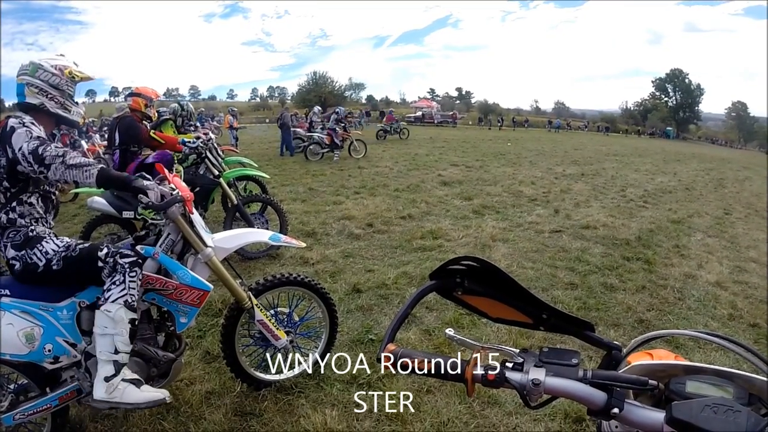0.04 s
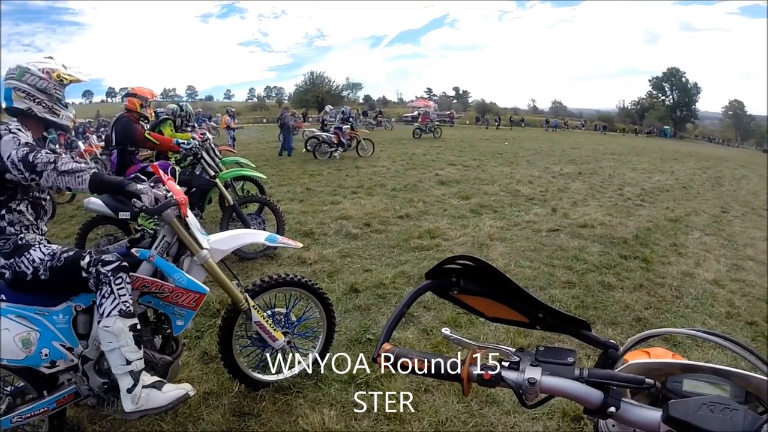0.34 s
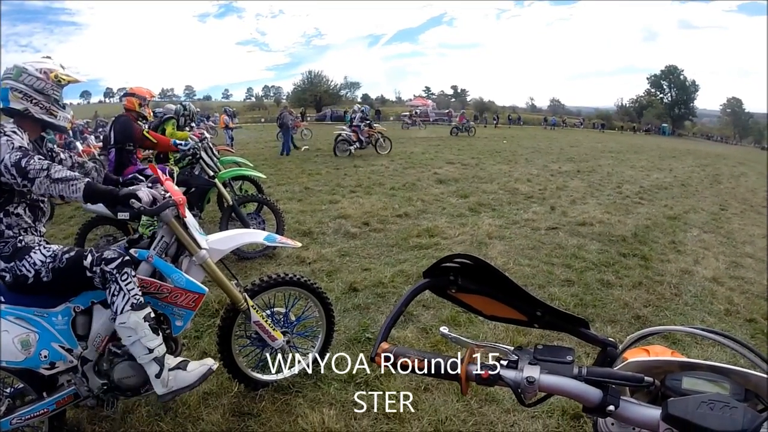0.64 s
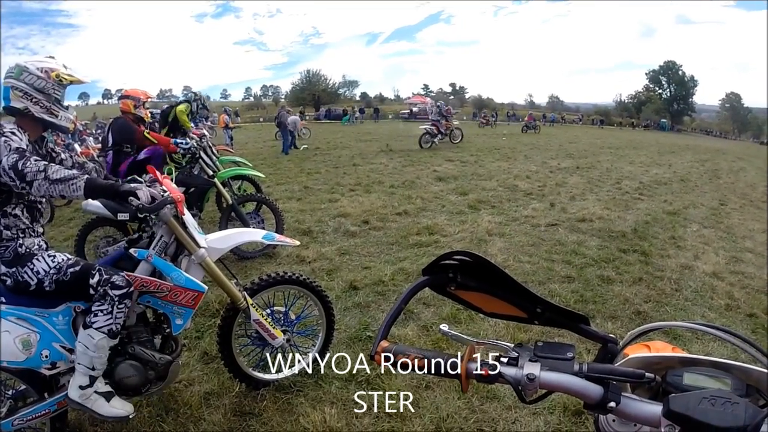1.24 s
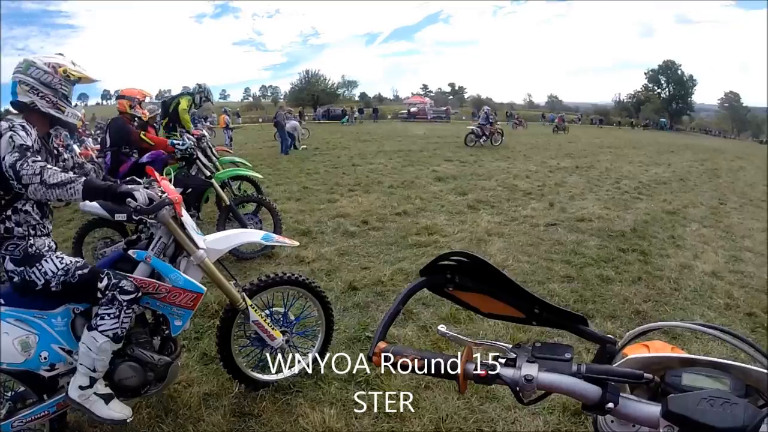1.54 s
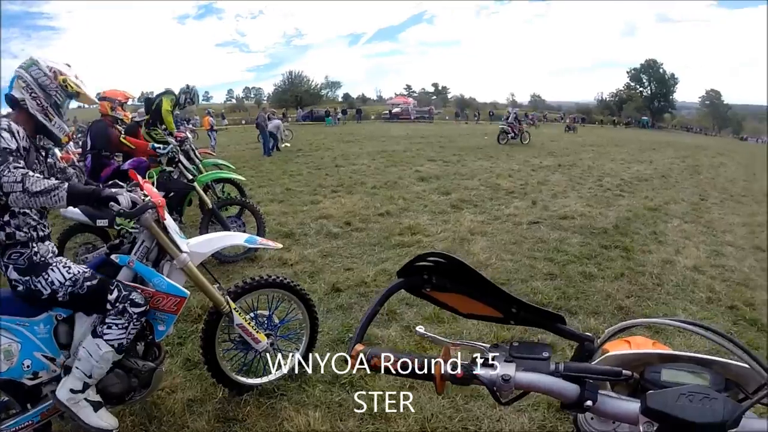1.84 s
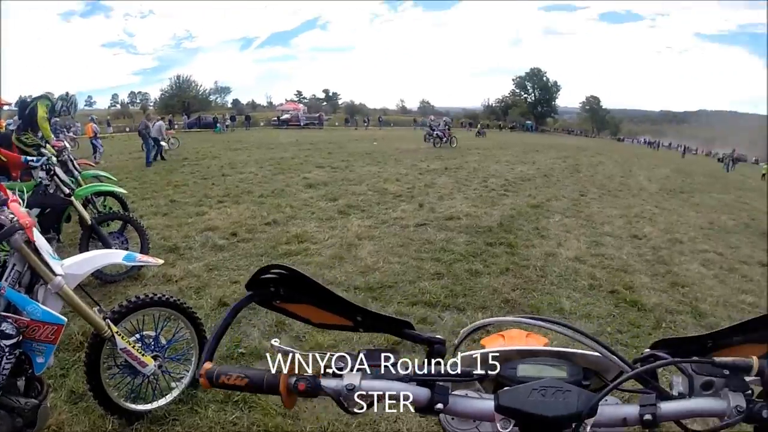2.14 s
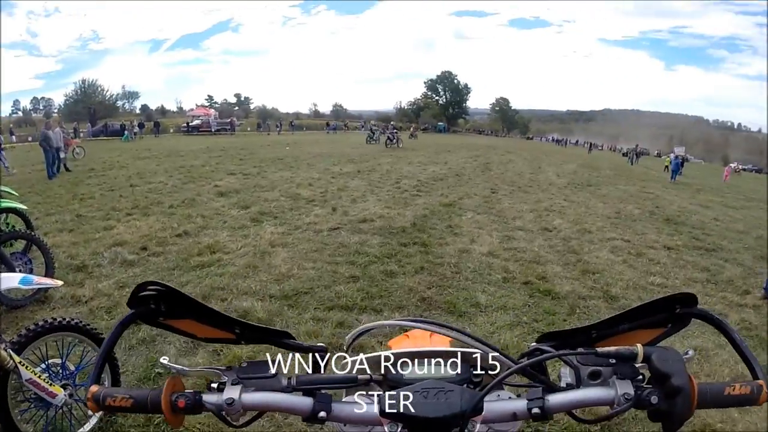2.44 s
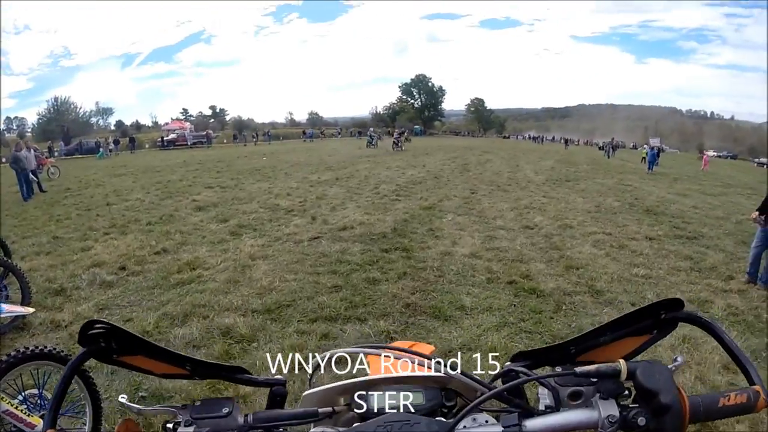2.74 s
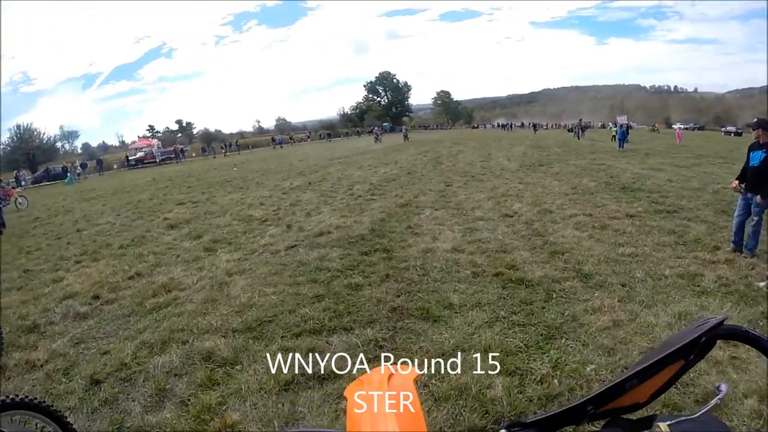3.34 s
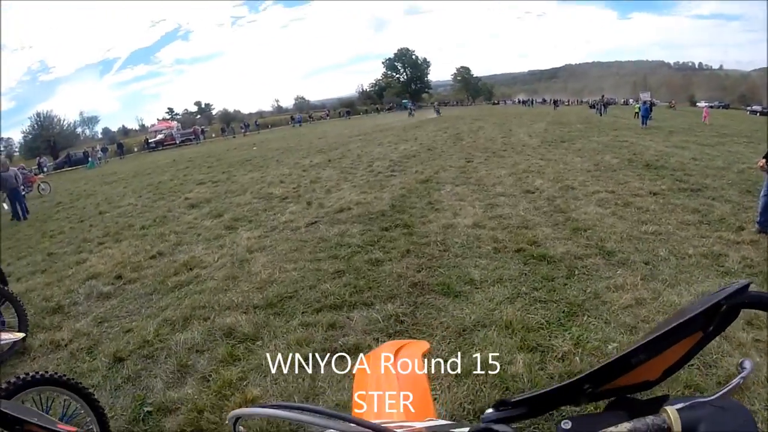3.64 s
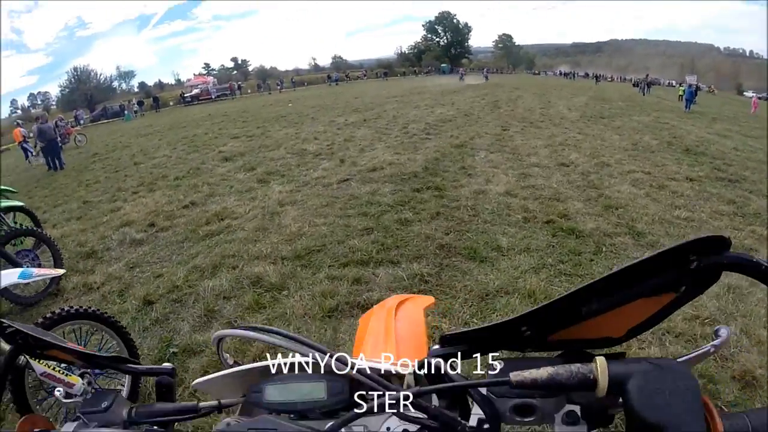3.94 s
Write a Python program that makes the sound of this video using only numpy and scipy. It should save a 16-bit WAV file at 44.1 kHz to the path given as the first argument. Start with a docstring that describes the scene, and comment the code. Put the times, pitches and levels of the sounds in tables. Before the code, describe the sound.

Dirt bikes rev close by with hard, ringing pops and a deeper thumping engine, climbing in pitch and staying high. Other bikes idle and roar farther off across an open field, heard from a rider's helmet.

```python
"""Dirt bikes at a start line.

Open grass field, heard from a rider's helmet. Each firing is a pulse and a puff of gas that ring
an exhaust. Two two-strokes rev with hard, ringing pops; a four-stroke idles, is blipped three
times, then held up. Behind them the rest of the row throbs and hisses."""
import sys
import numpy as np
from scipy import signal
from scipy.fft import rfft, irfft
from scipy.io import wavfile
from scipy.ndimage import uniform_filter1d, minimum_filter1d

SR = 44100
rng = np.random.default_rng(int(sys.argv[2]) if len(sys.argv) > 2 else 0)


def int16_out(signal):
    """Quantize to a 16-bit WAV file."""
    q = np.round(np.clip(np.atleast_2d(signal).T, -1, 1) * 32767)
    wavfile.write(sys.argv[1], SR, q.astype(np.int16))


N = 176400
TAPS = 8192
TIME_S = np.arange(N) / SR
BINS_HZ = np.fft.rfftfreq(TAPS, 1 / SR)

# Idling row, silencer booms: time_s, low_db, upper_db
ROW_LEVELS = [(0.0, -14.5, -32), (0.15, -47, -36), (0.42, -33, -34), (0.51, -40, -62), (0.68, -42, -30.5),
              (0.76, -33, -47), (1.47, -55, -33), (1.68, -41, -41), (1.86, -55, -27.5), (1.92, -45, -34.5),
              (2.57, -50, -35), (2.61, -24.5, -25), (2.66, -49, -56), (2.85, -40, -33), (3.98, -46, -54),
              (4.0, -41, -45)]
# Distant roar as other bikes open up: time_s, level_db
ROAR_LEVEL = [(0, -33.5), (.13, -33), (.2, -30.5), (.36, -27.5), (.52, -31), (.7, -26.5), (1.2, -26.5),
              (2.2, -27), (2.6, -30), (3.3, -28), (4, -29)]
# Distant engines and air: freq_hz, gain_db
ROAR_SPECTRUM = [(20, -5.5), (45, -7), (70, -1.5), (130, -1.5), (270, -3), (450, -13), (900, -15),
                 (1200, -6.5), (1500, -5), (1750, -10), (1900, -5.5), (2200, -6), (2540, 2), (2720, -2.5),
                 (2880, 1.5), (3200, -7.5), (3650, 0), (4150, -9), (4650, -2.5), (5400, -17.5), (6100, -14),
                 (7300, -23), (7900, -22.5), (10000, -31), (16000, -41)]

# Four-stroke speed: time_s, firing_hz
FOUR_STROKE_RATE = [(0.0, 10.37), (0.82, 11.16), (0.97, 37.35), (1.1, 32.01), (1.4, 31.33), (2.08, 30.32),
                    (2.2, 43.82), (2.4, 39.45), (2.58, 36.38), (2.66, 33.97), (2.79, 48.73), (2.98, 42.2),
                    (3.13, 38.67), (3.3, 39.91), (3.5, 45.81), (3.78, 48.32), (4.0, 45.24)]
# Four-stroke overall, and bark relative to thump: time_s, level_db
FOUR_STROKE_LEVEL = [(0, -44.5), (.8, -39), (.88, -36), (.96, -26), (1, -30.5), (1.05, -41.5), (1.4, -39),
                     (2.08, -38), (2.15, -29.5), (2.23, -31), (2.34, -44), (2.56, -38.5), (2.66, -44),
                     (2.74, -30), (2.81, -29), (2.87, -35.5), (3.1, -43.5), (3.38, -34), (3.8, -35),
                     (4, -34.5)]
BARK_LEVEL = [(0, -16), (.85, -3), (.95, 1.5), (1.05, -5), (2.2, -5), (2.8, -3), (3.3, -11), (4, -0.5)]
# Exhaust thump: freq_hz, gain_db
THUMP_SPECTRUM = [(30, -33), (80, -19.5), (150, 1), (250, 1), (340, 4), (400, -1.5), (480, -10.5),
                  (580, -6), (700, -13), (820, -9.5), (950, -16.5), (1250, -4), (2000, -24), (5000, -42),
                  (12000, -74)]
# Bark resonances: freq_hz, width_hz, gain_db
BARK_MODES = [(790, 120, -8), (1080, 160, -19), (1280, 160, -6.5), (2620, 1700, -11)]

# Near two-stroke speed: time_s, firing_hz
NEAR_RATE = [(0.0, 51.2), (0.15, 70.26), (0.25, 78.13), (0.37, 92.32), (0.55, 62.2), (0.7, 84.87),
             (0.83, 80.38), (0.94, 62.66), (1.1, 80.06), (1.28, 74.0), (1.38, 63.89), (1.6, 72.13),
             (1.69, 63.25), (1.82, 77.07), (2.0, 81.92), (2.13, 97.12), (2.58, 103.62), (2.72, 94.0),
             (2.86, 108.74), (2.98, 96.59), (3.3, 99.19), (3.42, 104.04), (4.0, 96.89)]
# Its main ring, low ring and intake: time_s, level_db
NEAR_MAIN_LEVEL = [(0.0, -43), (0.14, -44), (0.21, -34), (0.52, -42.5), (0.63, -28), (0.83, -31),
                   (0.86, -38), (0.98, -28), (1.27, -28), (1.38, -36.5), (1.66, -28.5), (1.78, -22.5),
                   (1.95, -29), (2.24, -27.5), (2.27, -32), (2.31, -25.5), (2.35, -31.5), (2.43, -28),
                   (2.75, -36.5), (2.83, -29), (3.12, -35.5), (3.2, -34), (3.23, -37), (4.0, -39.5)]
NEAR_LOW_LEVEL = [(0.0, -32.5), (0.13, -45), (0.17, -33), (0.38, -33), (0.52, -43.5), (0.66, -29),
                  (0.9, -35), (0.96, -27), (0.99, -29), (1.56, -40), (1.6, -54), (1.71, -33.5), (1.93, -40),
                  (2.21, -39.5), (2.67, -67), (2.75, -38), (2.82, -29), (2.85, -49), (3.98, -38),
                  (4.0, -42)]
INTAKE_LEVEL = [(0.0, -42.5), (0.27, -42), (0.54, -38), (0.71, -32), (0.88, -40.5), (0.99, -33),
                (1.26, -35), (1.36, -41), (1.48, -34.5), (1.59, -45), (1.7, -35.5), (1.74, -33),
                (1.84, -29), (1.96, -44), (2.0, -29), (2.6, -29), (2.62, -60), (2.67, -50), (2.84, -26),
                (3.03, -32.5), (3.72, -31), (4.0, -48)]
# Its exhaust resonances: freq_hz, width_hz, gain_db
NEAR_MAIN_MODES = [(1423, 78, -3.5), (1518, 96, -1), (1554, 32, -1), (2496, 75, -3), (2863, 96, -5),
                   (3590, 340, -8.5), (4770, 106, -13), (5570, 110, -15.5), (8000, 260, -28)]
NEAR_LOW_MODES = [(560, 24, -10), (800, 20, -10.5), (1034, 23, -5), (1198, 53, 0)]
# Intake tone: freq_hz, gain_db
INTAKE_SPECTRUM = [(60, 2), (105, -46.5), (155, -4.5), (212, 4), (255, 5.5), (305, -5), (400, -27.5),
                   (570, -13.5), (800, -32.5), (1000, -63)]
# Shelf on the upper intake harmonics: time_s, gain_db
INTAKE_SHELF = [(0, -3), (1.8, 3), (2.3, -0.5), (2.9, -1), (3.2, 2.5), (3.45, -10), (4, -14)]

# Sharp two-stroke speed: time_s, firing_hz
SHARP_RATE = [(0.0, 43.85), (0.8, 35.04), (1.2, 60.4), (1.35, 61.16), (1.65, 73.64), (2.0, 74.41),
              (2.25, 83.68), (2.5, 84.08), (2.72, 87.96), (2.85, 96.78), (2.95, 98.33), (3.05, 85.52),
              (3.2, 86.97), (3.45, 94.17), (3.7, 99.24), (4.0, 103.33)]
# Its band levels: time_s, low_db, mid_db, high_db, rasp_db, sizzle_db
SHARP_LEVELS = [(0.0, -62, -63, -73, -64, -64), (0.37, -52, -29, -31, -44, -45),
                (0.52, -58, -40, -35, -44, -52), (0.65, -47, -35, -30, -40, -47.5),
                (0.89, -41, -35, -34, -33, -48.5), (1.06, -31, -25, -36, -30.5, -45),
                (1.37, -38, -22.5, -25.5, -33, -48.5), (1.8, -33, -22, -31, -31.5, -46.5),
                (1.94, -45, -35, -53, -37, -46), (2.27, -26, -24, -26, -31.5, -43),
                (2.58, -23, -27.5, -24, -25, -41.5), (2.99, -25, -23.5, -28.5, -23.5, -38.5),
                (3.04, -24, -24.5, -34, -28, -52), (3.17, -24, -22.5, -29, -28, -39),
                (3.26, -25, -25.5, -29, -33.5, -45), (3.35, -23.5, -21.5, -23.5, -31.5, -36),
                (3.75, -26.5, -25, -21.5, -44, -44.5), (4.0, -36, -27.5, -31, -44, -47)]
# Its exhaust resonances: freq_hz, width_hz, gain_db
SHARP_LOW_MODES = [(1893, 47, 0.5), (2150, 90, -8)]
SHARP_MID_MODES = [(2561, 137, -0.64), (2884, 68, -0.36)]
SHARP_HIGH_MODES = [(3623, 560, 2.5), (3500, 69, -7)]
RASP_MODES = [(4636, 560, 1), (4640, 400, -0.5), (5390, 130, -8.5), (5940, 57, -10), (6550, 150, -45)]
# Its treble, and the dry crack leading each pop: freq_hz, gain_db
SIZZLE_SPECTRUM = [(4000, -62), (6300, 11), (6900, 1.5), (7350, -29), (7830, 7), (8350, -9.5), (8700, -7),
                   (9500, -14), (11500, -11), (13200, -22.5), (14200, -18), (16000, -58)]
CRACK_SPECTRUM = [(500, -33), (1100, -22), (1500, 1.5), (2200, -4), (3000, -5.5), (3700, 1), (4700, 4),
                  (5400, -7.5), (6500, -21), (9000, -19.5)]

# Echoes off the ground and neighbouring bikes: delay_s, gain_db
ECHOES = [(.0031, -23), (.0047, -14), (.0083, -17.5)]


def amp(db):
    """Decibels to gain."""
    return 10 ** (np.asarray(db) / 20)


def unit(x):
    """Scale to rms 1."""
    return x / np.sqrt(np.mean(x ** 2) + 1e-20)


def curve(table, column=1):
    """One column of a time table, per sample."""
    rows = np.array(table)
    return np.interp(TIME_S, rows[:, 0], rows[:, column])


def spectrum(table, at_hz=BINS_HZ):
    """Gain of a spectrum table, interpolated in log frequency."""
    freq_hz, gain_db = np.transpose(table)
    return amp(np.interp(np.log(at_hz + 1), np.log(freq_hz + 1), gain_db))


def pipe(modes, low_hz, high_hz):
    """Gain of resonances between two steep band edges."""
    power = sum(amp(db) ** 2 / (1 + (2 * (BINS_HZ - hz) / width_hz) ** 2) for hz, width_hz, db in modes)
    return np.sqrt(power / (1 + (low_hz / (BINS_HZ + 1)) ** 10) / (1 + (BINS_HZ / high_hz) ** 10))


def ring(x, gain):
    """Minimum-phase filter of the given shape; output rms 1."""
    log_gain = np.log(np.maximum(gain / gain.max(), 1e-5))
    mirrored = np.r_[log_gain, log_gain[-2:0:-1]]
    log_response = np.conj(signal.hilbert(mirrored))[:len(BINS_HZ)]
    impulse = irfft(np.exp(log_response))[:TAPS // 2]
    return unit(signal.oaconvolve(x, impulse)[:N])


def drift(hz):
    """Slow random wander, rms 1."""
    rolloff = np.exp(-(np.fft.rfftfreq(N, 1 / SR) / hz) ** 2)
    return unit(irfft(rfft(rng.standard_normal(N)) * rolloff, N))


def firings(rate_hz, uneven_db, jitter_s, start_cycles=0):
    """One click per cycle, uneven in strength and timing; equal power at any speed."""
    cycles = start_cycles + np.cumsum(rate_hz) / SR
    due = np.flatnonzero(np.diff(np.floor(cycles)) > 0)
    strength, lag = rng.standard_normal((len(due), 2)).T
    fired = np.clip(due + (lag * jitter_s * SR).astype(int), 0, N - 1)
    clicks = np.zeros(N)
    clicks[fired] = amp(uneven_db * np.minimum(strength, 1.3)) / np.sqrt(rate_hz[due])
    return clicks


def pops(clicks, gas_db, decay_s):
    """Per firing: a pressure pulse, then a dying puff of gas noise."""
    puff = signal.lfilter([1], [1, -np.exp(-1 / (decay_s * SR))], clicks + 1e-15)
    return unit(clicks) + amp(gas_db) * unit(puff * rng.standard_normal(N))


def idling_row():
    """Unevenly idling engines boom in their silencers."""
    clicks = firings(rate_hz=27.5 * amp(.4 * drift(hz=6)), uneven_db=1, jitter_s=.0007)
    low = ring(pops(clicks, gas_db=-6.5, decay_s=.016), pipe([(85.2, 10.4, 0)], low_hz=59.4, high_hz=115))
    clicks = firings(rate_hz=39 * amp(.3 * drift(hz=4.94)), uneven_db=2.5, jitter_s=.0004)
    upper = ring(pops(clicks, gas_db=-14, decay_s=.022), pipe([(153, 17, 0)], low_hz=119, high_hz=193))
    return amp(curve(ROW_LEVELS) - 1.5) * low + amp(curve(ROW_LEVELS, column=2) - 2.5) * upper


def distant_roar():
    """Many far engines merge into one ringing hiss."""
    hiss = ring(rng.standard_normal(N), spectrum(ROAR_SPECTRUM))
    return amp(curve(ROAR_LEVEL) + .81 * drift(hz=10)) * hiss


def four_stroke():
    """Slow, deep exhaust thumps swell and bark with each throttle blip."""
    clicks = firings(curve(FOUR_STROKE_RATE), uneven_db=.4, jitter_s=0, start_cycles=.27)
    thump = ring(pops(clicks, gas_db=-19, decay_s=.006), spectrum(THUMP_SPECTRUM))
    bark = ring(pops(clicks, gas_db=2.5, decay_s=.0038), pipe(BARK_MODES, low_hz=800, high_hz=4140))
    return amp(curve(FOUR_STROKE_LEVEL)) * (thump + amp(curve(BARK_LEVEL)) * bark)


def intake(rate_hz, shelf_hz=294):
    """Clean intake drone: eight harmonics of the firing rate."""
    cycles = np.cumsum(rate_hz) / SR
    shelf_db = curve(INTAKE_SHELF)
    drone = 0
    for k in range(1, 9):
        above_shelf = 1 / (1 + (shelf_hz / (k * rate_hz)) ** 20)
        gain = spectrum(INTAKE_SPECTRUM, k * rate_hz) * amp(shelf_db * above_shelf)
        drone += gain * np.cos(2 * np.pi * k * cycles)
    return amp(curve(INTAKE_LEVEL) + 1.55 * drift(hz=16) - 1) * unit(drone)


def near_two_stroke():
    """Revved in bursts: hollow exhaust pops over the intake drone."""
    rate_hz = curve(NEAR_RATE)
    clicks = firings(rate_hz, uneven_db=1.1, jitter_s=.00004)
    drive = pops(clicks, gas_db=-5, decay_s=.0076)
    main = ring(drive, pipe(NEAR_MAIN_MODES, low_hz=1280, high_hz=6500))
    low = ring(clicks, pipe(NEAR_LOW_MODES, low_hz=460, high_hz=1405))
    exhaust = amp(curve(NEAR_MAIN_LEVEL) + 3) * main + amp(curve(NEAR_LOW_LEVEL) - 3.5) * low
    return exhaust + intake(rate_hz)


def sharp_two_stroke(crack_cutoff_hz=10000):
    """Crisp pops ring the pipe and silencer as the speed climbs."""
    clicks = firings(curve(SHARP_RATE), uneven_db=.7, jitter_s=.00004)
    body = pops(clicks, gas_db=-2, decay_s=.003)
    snap = pops(clicks, gas_db=-2, decay_s=.001)
    gas = pops(clicks, gas_db=12, decay_s=.0022)
    bands = [amp(-5.5) * ring(body, pipe(SHARP_LOW_MODES, low_hz=1630, high_hz=2280)),
             amp(-3.5) * ring(body, pipe(SHARP_MID_MODES, low_hz=2260, high_hz=3440)),
             amp(-5.5) * ring(snap, pipe(SHARP_HIGH_MODES, low_hz=2740, high_hz=3980)),
             amp(-2) * ring(body, pipe(RASP_MODES, low_hz=3910, high_hz=6500)),
             amp(-.5) * ring(gas, spectrum(SIZZLE_SPECTRUM))]
    ringing = sum(band * amp(curve(SHARP_LEVELS, column)) for column, band in enumerate(bands, 1))
    lowpass = signal.butter(6, crack_cutoff_hz, fs=SR, output="sos")
    crack = signal.sosfilt(lowpass, ring(snap, spectrum(CRACK_SPECTRUM)))
    rasp_db = curve(SHARP_LEVELS, column=4)
    return ringing + amp(rasp_db - 5) * crack


def reflections(x, scatter_db=-13, t60_s=.14, cutoff_hz=900):
    """Direct sound plus close echoes and short scatter off the row; bass passes direct."""
    t = TIME_S[:TAPS]
    tail = unit(rng.standard_normal(TAPS) * amp(-60 * t / t60_s))
    impulse = amp(scatter_db) * tail / np.sqrt(TAPS)
    for delay_s, gain_db in ECHOES:
        impulse += amp(gain_db) * np.sinc((t - delay_s) * SR)
    treble = signal.sosfilt(signal.butter(2, cutoff_hz, "highpass", fs=SR, output="sos"), x)
    return x + signal.oaconvolve(treble, impulse)[:N]


def scene():
    """Three close bikes over the idling row and far engines; mono."""
    close = reflections(sharp_two_stroke() + near_two_stroke() + four_stroke())
    return (close + idling_row() + distant_roar())[None]


def record(dry, ceiling=.46, window_s=.004, cutoff_hz=15400):
    """Peak limiter, then low-pass."""
    size = int(window_s * SR)
    needed_gain = ceiling / np.maximum(abs(dry), ceiling)
    gain = uniform_filter1d(minimum_filter1d(needed_gain, size), size)
    lowpass = signal.firwin(401, cutoff_hz, window=("kaiser", 9), fs=SR)
    return signal.oaconvolve(dry * gain, lowpass[None], "same")


dry = scene()
out = record(dry)
int16_out(out)
```